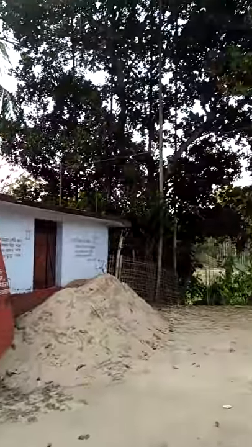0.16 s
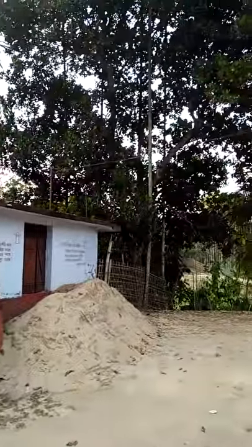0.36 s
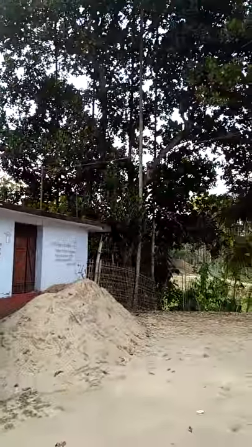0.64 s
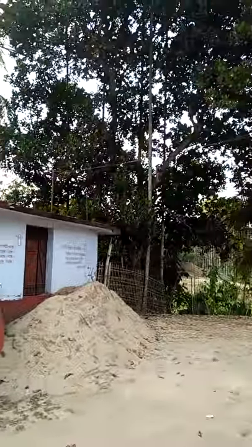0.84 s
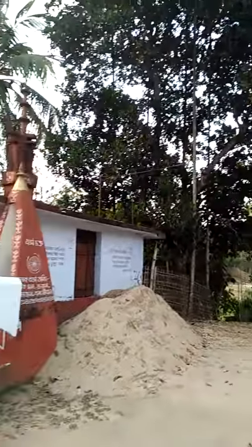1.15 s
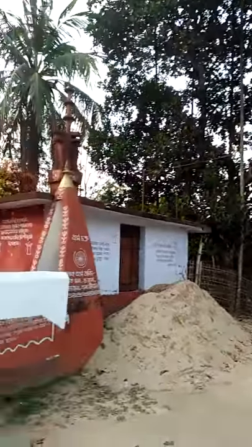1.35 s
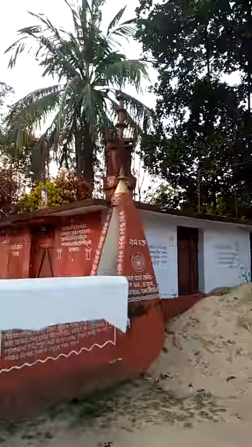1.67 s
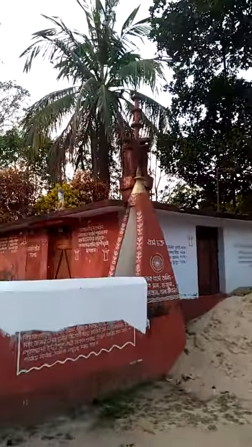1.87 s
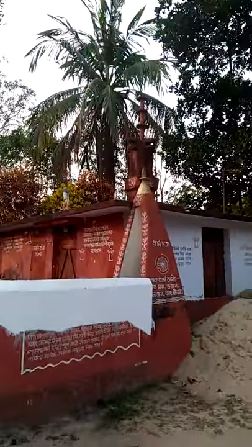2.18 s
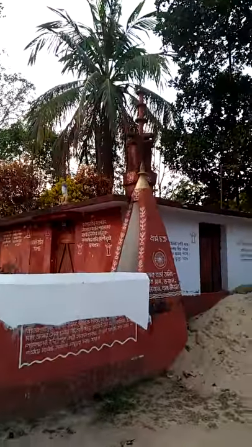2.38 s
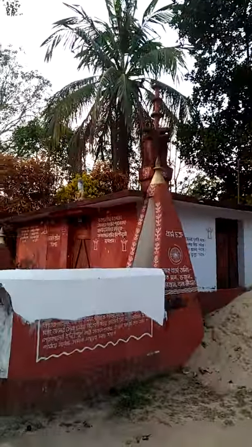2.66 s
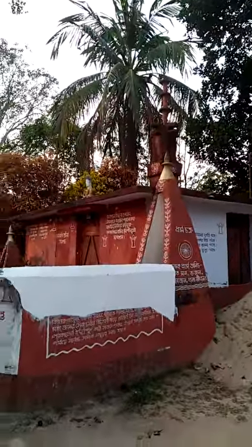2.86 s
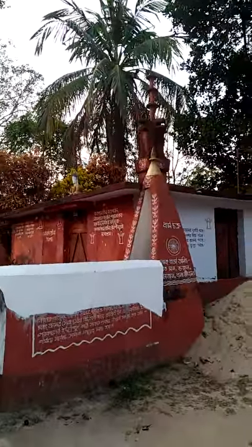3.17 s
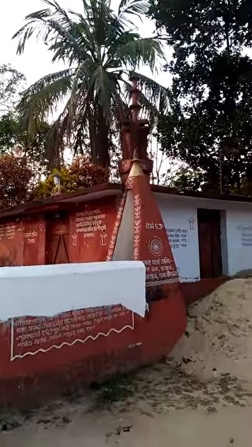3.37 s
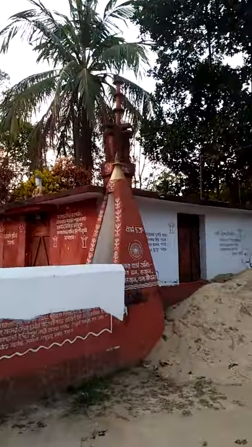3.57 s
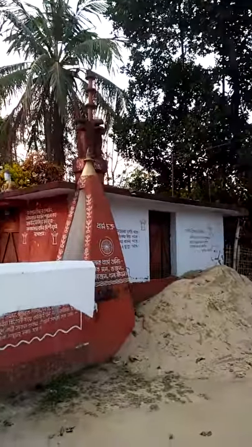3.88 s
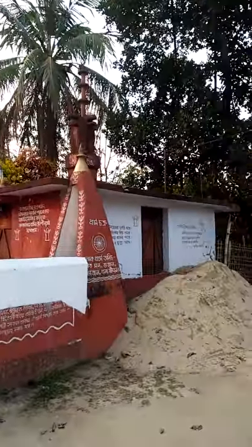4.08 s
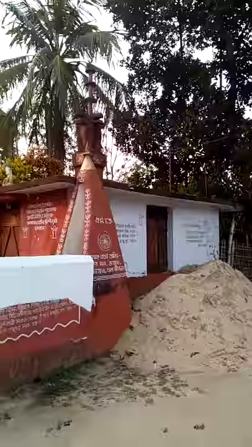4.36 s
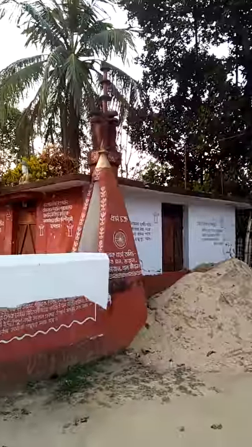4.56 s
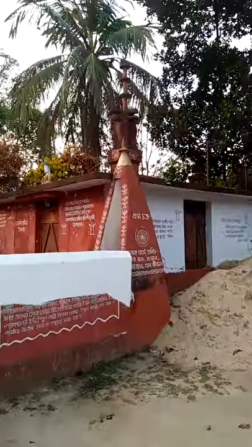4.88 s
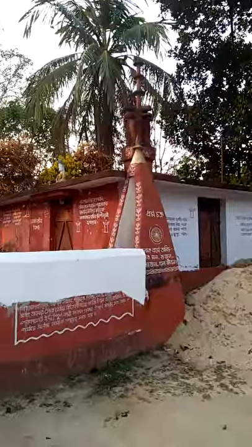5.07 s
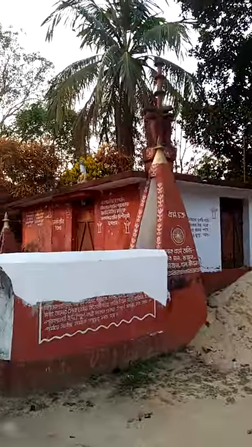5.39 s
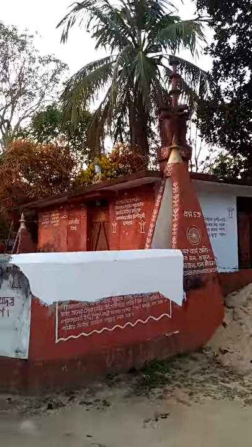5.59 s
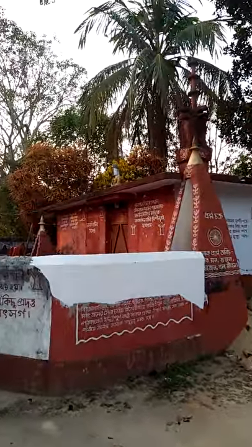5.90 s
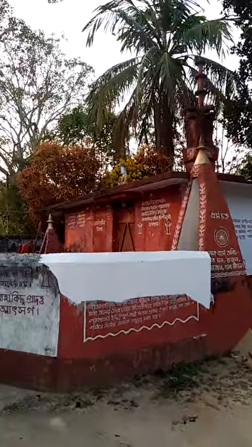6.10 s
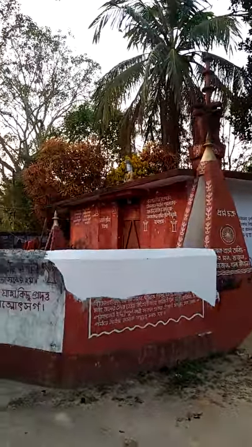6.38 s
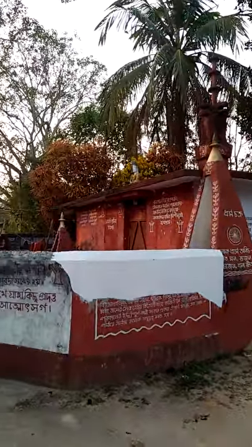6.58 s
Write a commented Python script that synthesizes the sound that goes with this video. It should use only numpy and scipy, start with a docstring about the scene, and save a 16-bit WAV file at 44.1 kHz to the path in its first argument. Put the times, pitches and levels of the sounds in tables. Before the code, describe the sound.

An open yard beside buildings and trees, quiet and airy. From 0 to 1.2 s there is faint hiss, a low distant murmur and thin, soft bird chips and trills. Tiny dry ticks click close by at about 1.3 and 1.6 s. From about 1.6 s a single cow moo rises from a low, rough start, holds full and nasal around 2.0 to 2.5 s, then sags and roughens, gone by about 3.1 s, with short scattered echoes from walls and trunks. Birds whistle over it. Around 3.5 s a very faint dove-like coo lies beneath sparser calls. From about 4.4 s birds sound nearer: sharp bending whistles, buzzy fast trills and a swelling treble hiss, with a bright chirp near 6.2 s. Light wind rumbles in uneven lumps at the microphone, and a faint low hum swells late, until the end at 6.7 s.

```python
"""First the listener hears air hiss, a low murmur and thin bird trills; then a cow moos once across an open yard.
Small birds whistle and buzz in the trees, as bending near-sines that foliage smears, nearer later on.
Light wind rumbles on the microphone as lumpy low noise, over faint hums and a few small dry ticks close by.
The moo is a sum of voice partials shaped by throat and mouth; walls and trunks throw it back.
A treble hiss swells with the bird calls."""
import sys
import numpy as np
from scipy import signal
from scipy.io import wavfile
from scipy.ndimage import uniform_filter1d, map_coordinates

SR = 44100
rng = np.random.default_rng(int(sys.argv[2]) if len(sys.argv) > 2 else 0)


def dump_mix(stems):
    """Bounce the given channels to the path in sys.argv[1] as a 16-bit WAV at rate SR."""
    frames = np.atleast_2d(stems).T  # one column per channel
    limited = np.clip(frames, -1, 1)  # hard clip at full scale
    pcm = np.round(limited * 32767).astype(np.int16)
    wavfile.write(sys.argv[1], SR, pcm)


N = 297234  # samples, about 6.74 s

NEAR_FROM_S = 4.45  # from here on the birds sing from nearer perches


def amp(db):
    """Amplitude factor of a level in dB."""
    return 10 ** (np.asarray(db) / 20)


def evened(x):
    """The signal scaled to rms 1."""
    return x / np.sqrt(np.mean(x ** 2) + 1e-20)


def read(points, hz):
    """A (frequency, value) table read on a logarithmic frequency axis."""
    f, value = np.transpose(points)
    return np.interp(np.log(hz + 1), np.log(f + 1), value)


def along(rows):
    """Sample times and interpolated columns of a curve table."""
    s, *columns = np.transpose(rows)
    t = np.arange(s[0], s[-1], 1 / SR)
    return [t] + [np.interp(t, s, c) for c in columns]


def level(rows):
    """Amplitude over the whole scene from a (time, level) table."""
    return amp(np.interp(np.arange(N) / SR, *np.transpose(rows)))


def add(mix, s, sound):
    """Lay a sound into the mix from second s on."""
    part = mix[max(round(s * SR), 0):][:len(sound)]
    part += sound[:len(part)]


def drift(length, hz):
    """Smooth random wander of rms about 1, changing about hz times a second."""
    knots = rng.standard_normal(400)
    at = np.arange(0, length + 8, 8)  # every eighth sample, straight lines between
    curve = map_coordinates(knots, [at * hz / SR % 399], order=3)
    return np.interp(np.arange(length), at, curve)


def sine(hz):
    """A sine along a moving pitch, its phase the running sum of the pitch."""
    return np.sin(2 * np.pi * np.cumsum(hz) / SR)


# How alike left and right are in noise: (frequency [Hz], likeness [0-1])
STEREO_LIKENESS = [(4000, 1), (6000, 0.99), (9000, 0.46), (14000, 0.87)]


def noise(tone, size, patchy_db):
    """Two channels of rms 1 from random short-time spectra with drifting patches."""
    frames, hz = 4 * N // size + 5, np.fft.rfftfreq(size, 1 / SR)
    a, b, c, d, patches = rng.standard_normal((frames, len(hz), 5)).T
    patches = uniform_filter1d(patches, 8, 0)  # smooth across frequency, then time
    patches = evened(uniform_filter1d(patches, 10, 1))
    same = np.clip(read(STEREO_LIKENESS, hz), 0, 1)[:, None]
    left = a + 1j * b
    right = same * left + np.sqrt(1 - same ** 2) * (c + 1j * d)
    z = np.array([left, right]) * amp(read(tone, hz)[:, None] + patchy_db * patches)
    return evened(signal.istft(z, nperseg=size, noverlap=3 * size // 4)[1][:, :N])


# Colour of the air hiss: (frequency [Hz], relative level [dB per Hz])
AIR_TONE = [(100, -31.5), (150, -41.5), (390, 4.5), (730, -5), (1400, 4.5), (3100, 1.5), (4700, -58.5),
            (9000, -10), (10500, -16.5), (14200, -16)]
AIR_DB = -75


def air():
    """Steady two-channel noise with strong patches drifting through its spectrum."""
    return amp(AIR_DB) * noise(AIR_TONE, 512, 7.7)


# Far traffic and leaves swell: (time [s], level [dB])
MURMUR_LEVEL = [(0, -80), (.7, -78.5), (1.5, -69), (3.3, -72.5), (3.6, -71), (5.5, -70), (6.74, -67)]
# Colour of that murmur: (frequency [Hz], relative level [dB per Hz])
MURMUR_TONE = [(200, -36), (450, -20.5), (600, 0), (800, 2), (1200, -6), (2000, -5), (4000, -40.5)]


def murmur():
    """Far traffic and leaves as mid-band noise, alike in both channels."""
    return level(MURMUR_LEVEL) * noise(MURMUR_TONE, 1024, 1.5)[0]


# Gusts at the microphone before the quick lumps: (time [s], level [dB])
GUSTS = [(0, -74), (.1, -84.5), (1.05, -80), (1.19, -70), (1.3, -88), (1.7, -67.5), (2.3, -68), (2.95, -64),
         (3.13, -72), (3.23, -82), (3.5, -84), (3.9, -67), (4.1, -82), (4.75, -69), (5, -79), (5.5, -71),
         (5.72, -72), (5.87, -64), (6.35, -68.5), (6.74, -62)]
# Colour of the wind rumble: (frequency [Hz], relative level [dB per Hz])
WIND_TONE = [(15, -43.5), (35, -31), (50, -10), (63, 4), (85, -9), (120, -6), (200, -12.5), (320, -25),
             (500, -62)]


def wind():
    """Light wind rumbles on the microphone: low noise, lumpy in level, alike in both channels."""
    lumps = amp(4.2 * drift(N, 12))
    return level(GUSTS) * lumps * noise(WIND_TONE, 2048, 0.5)[0]


# Common level of the low hum lines: (time [s], level [dB])
HUM_LEVEL = [(0, -95), (5.2, -87.5), (5.6, -72), (6.3, -72), (6.45, -94), (6.74, -61.5)]
# Hum lines: (frequency [Hz], level against the common one [dB])
HUM_LINES = [(61, 2), (152, 0), (196, -6)]


def hum():
    """Low tones, each wavering slowly in level and pitch."""
    lines = np.zeros(N)
    for hz, db in HUM_LINES:
        waver = amp(db + 2.24 * drift(N, 3.4))
        lines += waver * sine(hz + 1.486 * drift(N, 0.26))
    return level(HUM_LEVEL) * lines


# A thin hum throughout: (frequency [Hz], peak level [dB]), both before their wander
THIN_HUM = (340, -91)


def thin_hum():
    """One faint tone that wanders in level and pitch."""
    hz, db = THIN_HUM
    return amp(db + 3 * drift(N, 4)) * sine(hz + 4 * drift(N, 6))


def leaves(call, smear_db, near_t60=0.045, far_t60=0.5):  # decay times in s
    """Foliage scatters a call into a short dense smear, and trunks farther off add a longer one."""
    t = np.arange(16000) / SR
    decay = amp(-60 * t / near_t60) + amp(-7.5 - 60 * t / far_t60)
    smear = rng.standard_normal(16000) * decay
    smear *= amp(smear_db) / np.linalg.norm(smear)  # level against the direct call
    smear[0] = 1  # the direct call
    return signal.fftconvolve(call, smear)


# Second and third partial of a whistle before the loss with distance: one level each [dB]
OVERTONES_DB = [-21, -35]
FAR_OVERTONES_DB = -10  # distance dulls the overtones of the far birds


def whistle(hz, flutter, jitter, dull_db):
    """A near sine with weak overtones, fluttering in level and trembling in pitch."""
    turns = np.cumsum(hz * (1 + jitter * drift(len(hz), 400.7))) / SR
    tone = np.sin(2 * np.pi * turns)
    for k, db in enumerate(OVERTONES_DB, start=2):
        tone += amp(db + dull_db) * np.sin(2 * np.pi * k * turns)
    return np.sqrt(2) * tone * (1 + flutter * drift(len(hz), 60.9))


SWELL_DB, FADE_DB = 23.5, 16.5  # dB per note length, gained towards the peak and lost after it


def note(length, first_hz, middle_hz, last_hz, db, peak, flutter, jitter, dull_db):
    """The pitch bends through three points while the level swells to one peak and fades."""
    t = np.arange(0, length, 1 / SR)
    u = t / length
    bend_hz = middle_hz - (first_hz + last_hz) / 2
    hz = first_hz + (last_hz - first_hz) * u + bend_hz * np.sin(np.pi * u)
    level_db = db - SWELL_DB * np.maximum(peak - u, 0) - FADE_DB * np.maximum(u - peak, 0)
    edges = np.clip(np.minimum(t / 0.00059, (length - t) / 0.014), 0, 1)  # sharp start, soft end
    return amp(level_db) * whistle(hz, flutter, jitter, dull_db) * edges


# Whistled notes: (start [s], length [s], first pitch [Hz], middle pitch [Hz], last pitch [Hz],
# level at the peak [dB], place of the peak [0-1])
WHISTLED_NOTES = [(0.342, 0.015, 5520, 5760, 5560, -56.5, 0.58),
                  (0.418, 0.013, 1930, 1690, 1550, -56.5, 0.75),
                  (0.448, 0.059, 4420, 5090, 5480, -61.5, 0.96), (0.497, 0.11, 5490, 5385, 5340, -65, 0),
                  (0.476, 0.093, 2234, 2175, 1970, -56, 0.53), (.48, 0.098, 2416, 2540, 2410, -64, 0.3),
                  (0.587, 0.057, 4380, 5150, 6480, -64, 1), (0.618, 0.063, 4410, 3660, 3330, -64, 0.17),
                  (0.636, 0.019, 1930, 1720, 1490, -55, 0.87), (0.759, 0.05, 4550, 3900, 3580, -65.5, 0.24),
                  (0.956, 0.18, 2880, 2987, 2820, -70, 0.1), (1.071, 0.052, 2030, 1770, 1690, -59.5, 0),
                  (1.159, 0.057, 1916, 2250, 2180, -57, 0.52),
                  (1.206, 0.089, 2200, 2293, 2370, -55.5, 0.12),
                  (1.253, 0.12, 3560, 3500, 3525, -53.5, 0.65),
                  (1.352, 0.056, 3430, 3325, 3080, -48.5, 0.55), (1.26, 0.018, 4420, 4050, 3700, -58, 0.4),
                  (1.33, 0.04, 5320, 5820, 5870, -61, 0.4), (1.399, 0.13, 3525, 3400, 3430, -57, 0.25),
                  (1.442, 0.036, 4250, 4600, 4900, -66, 0.76), (1.483, 0.16, 4940, 4920, 4950, -73, 0.12),
                  (1.522, 0.11, 3143, 2966, 2680, -56.5, 0.3), (1.625, 0.036, 3940, 3450, 2880, -68, 0.64),
                  (1.64, 0.034, 4840, 5320, 5600, -64.5, 0.5), (1.655, 0.12, 2784, 2900, 2820, -61.5, 0.28),
                  (1.685, 0.053, 3780, 4320, 4630, -61, 0.6), (1.729, 0.14, 4430, 4580, 4750, -59, 0.2),
                  (1.744, 0.09, 4220, 3980, 4110, -55.5, 0.34), (1.789, 0.12, 4490, 4155, 3820, -58, 0.6),
                  (1.843, 0.16, 4920, 5110, 4870, -60, 0.3), (1.915, 0.06, 2680, 2740, 2600, -54.5, 0.53),
                  (2.03, 0.089, 4400, 3920, 3290, -44.5, 0.99),
                  (2.108, 0.09, 3550, 3280, 2930, -49.5, 0.48), (2.173, 0.15, 4240, 4178, 4240, -55, 0.58),
                  (2.501, 0.086, 2065, 2315, 2469, -54, 0.78), (2.68, 0.18, 2750, 2900, 3110, -60, 0.46),
                  (2.354, 0.022, 4080, 4550, 4250, -53, 0.5), (2.279, 0.14, 3290, 3315, 3346, -55, 0.33),
                  (2.349, 0.066, 3370, 3420, 3380, -52, 0.55),
                  (2.452, 0.061, 3830, 3867, 3470, -52.5, 0.68),
                  (2.524, 0.022, 3560, 3360, 3380, -48.5, 0.16),
                  (2.538, 0.053, 3450, 3710, 3800, -56.5, 0.25),
                  (2.587, 0.067, 4034, 3550, 3530, -54, 0.18),
                  (2.635, 0.095, 3480, 3410, 3340, -55.5, 0.11),
                  (2.673, 0.042, 3580, 3475, 3240, -47, 0.62),
                  (2.716, 0.039, 3460, 3640, 3652, -60.5, 0.57), (2.746, 0.07, 3520, 3430, 3620, -56, 0.53),
                  (2.813, 0.075, 3580, 3394, 3140, -50.5, 0.34), (2.921, 0.1, 4150, 4460, 4040, -53, 0.49),
                  (3.002, 0.13, 4150, 3900, 3810, -54, 0.28), (3.114, 0.081, 3770, 3450, 3060, -56, 0.59),
                  (2.954, 0.16, 5340, 5460, 5680, -61.5, 0.03), (2.96, 0.082, 2607, 2450, 2499, -61, 0.25),
                  (3.025, 0.025, 2610, 2354, 2647, -57, 0.16), (3.388, 0.023, 3860, 3990, 3990, -78, 0.3),
                  (3.443, 0.064, 4130, 4190, 4800, -59.5, 0.75),
                  (3.458, 0.26, 3300, 3423, 3157, -62.5, 0.42), (3.8, 0.12, 2350, 2535, 2492, -49.5, 0.59),
                  (4.046, 0.13, 2550, 2580, 2450, -64, 0.5), (3.865, 0.18, 3430, 3464, 3240, -53, 0.9),
                  (4.028, 0.087, 3310, 3424, 3360, -59, 0.3), (3.916, 0.17, 3120, 3130, 2900, -68, 0.36),
                  (3.986, 0.28, 1194, 1281, 1282, -67.5, 0.07), (4.15, 0.086, 3000, 2988, 2720, -53, 0.46),
                  (4.24, 0.15, 2920, 2900, 2740, -62, 0.26), (4.161, 0.31, 1365, 1478, 1546, -69.5, 0.23),
                  (4.179, 0.026, 5350, 5460, 6430, -52, 0.9), (4.249, 0.021, 3660, 3360, 2950, -43.5, 0.95),
                  (4.278, 0.18, 2220, 1980, 1950, -63.5, 0.26), (4.305, 0.063, 3770, 4035, 4630, -55, 0.59),
                  (4.354, 0.03, 5060, 5490, 5570, -52, 0.4), (4.363, 0.1, 4190, 4500, 4430, -52, 0),
                  (4.44, 0.093, 4220, 3830, 3580, -53, 0.4), (4.485, 0.096, 1190, 1198, 1143, -53.5, 0.52),
                  (4.459, 0.032, 2465, 2300, 2250, -47, 0.3), (4.484, 0.065, 2510, 2680, 2790, -47.5, 0.14),
                  (4.546, 0.054, 2630, 2520, 2590, -52.5, 0.7),
                  (4.534, 0.09, 4490, 4713, 4830, -45.5, 0.34),
                  (4.565, 0.088, 3894, 3820, 3700, -57.5, 0.2),
                  (4.637, 0.036, 3600, 3800, 3320, -42.5, 0.48), (4.67, 0.046, 4240, 4240, 4030, -52, 0.35),
                  (4.71, 0.037, 4020, 3910, 3600, -54, 0.3), (4.785, 0.044, 3270, 3050, 2950, -65, 0.3),
                  (5, 0.12, 3180, 3208, 3370, -52.5, 0.4), (5.008, 0.17, 6730, 6220, 6240, -68.5, 0.5),
                  (5.049, 0.14, 4940, 4660, 4780, -62.5, 0.5), (4.728, 0.032, 7640, 7660, 7650, -60, 0.8),
                  (4.856, 0.12, 2550, 2416, 2380, -66, 0.05), (5.012, 0.12, 3860, 3660, 3600, -72, 0.2),
                  (5.508, 0.063, 5320, 5900, 5600, -69, 0.5), (5.489, 0.11, 2780, 2840, 2860, -45, 0.53),
                  (5.585, 0.117, 2900, 2902, 2890, -45.5, 0.34), (5.718, 0.066, 2874, 2880, 3050, -62, 0.9),
                  (5.526, 0.11, 4400, 4610, 4800, -56, 0.27), (5.622, 0.12, 4700, 5560, 5870, -63, 0.2),
                  (5.736, 0.076, 1935, 2130, 2080, -58, 0.63), (5.84, 0.1, 3453, 3480, 3660, -54, 0.63),
                  (5.844, 0.084, 5050, 5220, 5430, -66.5, 0.66),
                  (5.955, 0.098, 1860, 2060, 1975, -62.5, 0.45), (5.988, 0.039, 720, 698, 625, -63.5, 0.55),
                  (6.179, 0.047, 4650, 4652, 4880, -39, 0.45), (6.207, 0.12, 4260, 4250, 4020, -55, 0.65),
                  (6.349, 0.069, 2154, 2091, 1960, -53, 0.35), (6.396, 0.07, 6670, 7440, 7150, -60.5, 0.17),
                  (6.437, 0.075, 3450, 3273, 3050, -45, 0.97),
                  (6.494, 0.099, 3040, 3092, 2866, -46.5, 0.41),
                  (6.498, 0.1, 4700, 4520, 4450, -54.5, 0.14), (6.56, 0.13, 3620, 3640, 3810, -53, 0.22),
                  (6.653, 0.14, 3700, 3700, 3700, -54.5, 0.71), (6.578, 0.094, 940, 871, 900, -63, 0.4)]
TREMBLE_FAR, TREMBLE_NEAR = 0.012, 0.017  # share of the pitch by which a note trembles


def whistled_notes():
    """Single bird notes, duller from afar, each smeared by foliage."""
    out = np.zeros(N)
    for s, *shape in WHISTLED_NOTES:
        near = s > NEAR_FROM_S
        jitter, dull_db = (TREMBLE_NEAR, 0) if near else (TREMBLE_FAR, FAR_OVERTONES_DB)
        call = note(*shape, flutter=0.5, jitter=jitter, dull_db=dull_db)
        add(out, s, leaves(call, -2.0))
    return out


# A far dove, before its level wander: (start [s], length [s], first pitch [Hz], middle pitch [Hz],
# last pitch [Hz], level at the peak [dB], place of the peak [0-1])
DOVE_COO = (3.47, .8, 745, 735, 722, -76, .4)


def dove():
    """One low bending note, uneven in level and heavily smeared."""
    s, *shape = DOVE_COO
    coo = note(*shape, flutter=1.0, jitter=0.025, dull_db=FAR_OVERTONES_DB)
    uneven = amp(3.0 * drift(len(coo), 12))
    out = np.zeros(N)
    add(out, s, leaves(coo * uneven, 0.5))
    return out


# Trills of quick falling chips: (start [s], end [s], top pitch at the start [Hz],
# bottom pitch at the start [Hz], bottom pitch at the end [Hz], mean chip rate [1/s], level [dB])
CHIP_TRILLS = [(0, 0.104, 5200, 3290, 3360, 74, -68.5), (.0, 0.35, 2800, 2300, 1796, 40, -68.5),
               (0.482, 0.637, 2700, 2060, 1830, 47, -65.5), (0.739, 0.898, 2400, 1954, 1604, 44, -65),
               (0.634, 0.867, 4450, 3740, 3560, 63, -78), (0.533, 0.568, 6800, 3670, 3450, 56, -69.5),
               (1.605, 1.686, 3900, 2730, 2940, 54, -60.5), (2.254, 2.448, 4700, 3540, 3870, 66, -57),
               (1.19, 1.567, 2600, 2033, 1750, 84, -62.5), (1.882, 1.987, 4670, 3450, 3424, 69, -56),
               (2.256, 2.296, 7150, 4500, 4445, 49, -58), (3.404, 3.517, 4520, 3400, 4080, 77, -67.5),
               (3.509, 3.613, 2550, 2000, 2710, 73, -66), (3.573, 3.718, 2950, 2556, 1887, 63, -60.5),
               (4.186, 4.235, 5970, 5210, 5530, 59, -70), (4.411, 4.496, 2280, 1685, 2210, 51.5, -57),
               (4.525, 4.564, 7200, 4780, 4370, 170, -56.5), (4.579, 4.861, 4700, 3310, 3510, 90, -60),
               (5.139, 5.25, 6300, 4090, 3710, 110, -50.5), (5.174, 5.317, 5000, 3680, 3760, 87, -55.5),
               (5.466, 5.697, 3000, 2267, 2710, 120, -53.5), (6.06, 6.196, 3800, 3210, 2650, 113, -54),
               (6.112, 6.393, 4807, 2937, 3580, 126, -53), (6.155, 6.193, 7300, 4400, 4450, 76, -48.5),
               (6.367, 6.456, 4900, 3780, 3576, 92, -54), (6.497, 6.53, 6500, 4480, 4500, 93, -56.5),
               (6.622, 6.753, 4870, 3720, 3290, 76, -57), (6.251, 6.314, 8600, 7100, 7300, 62, -62.5)]
RASP = .03  # pitch tremble of a far trill as a share; near trills rasp twice as much


def trills():
    """The pitch drops over and over in quick chips, with a dip in level between them."""
    out = np.zeros(N)
    for s, end, top_hz, low_hz, last_hz, rate, db in CHIP_TRILLS:
        near = s > NEAR_FROM_S
        t = np.arange(0, end - s, 1 / SR)
        chip = np.cumsum(rate * (1 + .35 * drift(len(t), 40))) / SR % 1  # place within a chip
        bottom = np.linspace(low_hz, last_hz, len(t))
        reach = (top_hz - bottom) * np.linspace(1, .5, len(t))  # later chips reach less high
        hz = bottom * (1 + 0.0295 * drift(len(t), 49.87))
        hz += reach * (1 - chip) ** 1.5  # each chip drops fast, then levels off
        beat = np.sin(np.pi * chip) ** (.15 if near else .5)
        beat *= signal.windows.tukey(len(t), .45)
        dull_db = 0 if near else FAR_OVERTONES_DB
        call = whistle(hz, flutter=0.18, jitter=RASP * (1 + near), dull_db=dull_db)
        add(out, s, leaves(amp(db) * call * beat, -1.6))
    return out


# Colour of the hiss with the birds: (frequency [Hz], relative level [dB per Hz])
FIZZ_TONE = [(1500, -24), (2500, 1.5), (5000, -2.5), (7000, -4), (9200, -3.5), (10200, -13.5),
             (14200, -17.5)]
FIZZ_DB, NEAR_FIZZ_DB = -13, 5.5  # dB against song whose shrillness is at the pivot; dB more when near
FIZZ_PIVOT_DB, FIZZ_FOLLOW = -50, .6  # the hiss follows this share of the birds' swings in dB


def fizz(song):
    """A wide treble hiss rises and falls with the birds, most with the shrill ones."""
    shrill = signal.lfilter([1, -.8], [1], song)
    shrill = signal.lfilter([1, -.9], [1], shrill)
    loudness = np.sqrt(abs(uniform_filter1d(shrill ** 2, size=1800)))  # over about 41 ms
    near = np.arange(N) / SR > NEAR_FROM_S
    pivot = amp(FIZZ_PIVOT_DB)
    swell = pivot * (loudness / pivot) ** FIZZ_FOLLOW
    return amp(FIZZ_DB + NEAR_FIZZ_DB * near) * swell * noise(FIZZ_TONE, 512, 3.2)


# Small dry ticks close by: (time [s], starting level of the decay [dB], ring pitch [Hz], ring t60 [s])
DRY_TICKS = [(1.281, -30.5, 3570, 0.0014), (1.2855, -23, 6700, 0.00089), (1.597, -40.5, 1190, 0.0064),
             (1.6, -45, 1380, 0.0061)]


def ticks():
    """Each tick is a heavily damped ring with a burst of crackle."""
    out, t = np.zeros(N), np.arange(900) / SR
    for s, db, hz, t60 in DRY_TICKS:
        crackle = 0.11 * np.diff(rng.standard_normal(901)) * (hz / 5000)
        ring = np.sin(2 * np.pi * hz * t) + crackle
        onset = np.minimum(t / 0.00011, 1)
        add(out, s, leaves(amp(db - 60 * t / t60) * ring * onset, -0.45))
    return out


# Dying away of the yard's echoes: (frequency [Hz], t60 [s])
YARD_DECAY = [(200, 0.75), (1000, 0.4), (3000, 1), (8000, 0.14)]
BASS_ECHO = .15  # share of the whole voice, bass included, that the yard throws back


def yard(voice):
    """Sparse echoes of random sign off walls and trunks, each band dying at its own speed."""
    thin = signal.lfilter(*signal.butter(2, 500, "high", fs=SR), voice)  # little bass is scattered
    taps = np.zeros(SR)
    at = np.arange(400, SR - 20, 20)  # one echo in every 20 samples
    taps[at + rng.integers(0, 20, len(at))] = rng.choice([-1., 1.], len(at))
    hz, t, z = signal.stft(taps, SR, nperseg=256)
    decay = amp(-60 * t / read(YARD_DECAY, hz)[:, None])
    tail = signal.istft(z * decay, SR, nperseg=256)[1]
    thrown = amp(-2.0) * thin + BASS_ECHO * voice
    return signal.fftconvolve(thrown, tail / np.linalg.norm(tail))[:N]


def modes(table, hz):
    """Gain and phase of a set of resonances with steep skirts, along a slowly moving pitch."""
    slow_hz = hz[::16]
    gain = sum(amp(db) / np.square(1 + 2j * (slow_hz - f) / w) for f, w, db in table)
    return np.repeat(gain, 16)[:len(hz)]


# The moo across the yard: (time [s], pitch [Hz], effort [dB], mouth ring [dB], chest [dB]);
# mouth ring and chest (the lowest partial) are relative to the effort
MOO_COURSE = [(1.58, 70.2, -68, -13, -37), (1.68, 89.8, -66.5, -45, 0), (1.76, 118.4, -52.5, -3, -9.5),
              (1.866, 139.2, -44.5, 6.5, -11.5), (1.93, 143, -41, 3, -40), (1.975, 145.4, -55, 15, -16),
              (2.045, 148.2, -38.5, -2, -25.5), (2.11, 149.8, -38, 8, -18.5), (2.2, 151.4, -40.5, -3, -12),
              (2.27, 152.8, -35.5, -14, -18.5), (2.34, 152.8, -34, -5.5, -20),
              (2.45, 151.4, -37, -8, -15.5), (2.49, 150.7, -45, 7, -13), (2.58, 147, -48.5, 5, -19),
              (2.655, 141.5, -33.5, -7.5, -33), (2.7, 130.3, -55.5, 13.5, 3), (2.77, 108.6, -38, -2.5, -26),
              (2.84, 88.8, -52.5, 0.5, -1), (2.91, 71.75, -55.5, -15.5, -38), (2.99, 63.5, -80, 3, 10),
              (3.14, 60.6, -84.5, -13, 24.5), (3.2, 59.7, -100, 7, 26)]
# Resonances of throat and mouth: (frequency [Hz], width [Hz], gain [dB])
THROAT = [(282, 75, -1), (455, 80, -16), (620, 130, -13.5), (790, 200, -14)]
MOUTH = [(1060, 100, -3), (910, 120, -13), (1500, 300, -32), (1850, 200, -25), (2090, 150, -23)]
# Rings more as the voice slackens: (frequency [Hz], width [Hz], gain [dB])
SLACK_RING = [(1253, 52, -1)]
FIRM_HZ, ROUGH_FIRM = 158.9, 0.054  # Hz and roughness (0-1) of a firm, steady voice
ROUGH_RISING, ROUGH_FALLING = 0.9, 1.697  # roughness gained per share of pitch below FIRM_HZ
SHIMMER_DB = 3.5  # rms wander of the mouth ring at full roughness


def cow():
    """Pulses of the vocal folds as partials weighted by throat and mouth; slack pulses come unevenly."""
    t, hz, effort_db, mouth_db, chest_db = along(MOO_COURSE)
    rising = t < t[np.argmax(hz)]
    slack = np.where(rising, ROUGH_RISING, ROUGH_FALLING) * (1 - hz / FIRM_HZ)
    rough = np.clip(ROUGH_FIRM + slack, 0, 1)
    turns = np.cumsum(hz * (1 + 0.045 * rough * drift(len(t), 59.9))) / SR
    voice = amp(chest_db) * np.cos(2 * np.pi * turns)
    opening = amp(mouth_db + SHIMMER_DB * rough * drift(len(t), 69.87))
    for k in range(2, 32):
        mouth = modes(MOUTH, k * hz) + rough * modes(SLACK_RING, k * hz)
        gain = modes(THROAT, k * hz) + opening * mouth
        blur = 0.06 * rough ** 1.5 * k  # slack folds unsettle the higher partials most
        phase = 2 * np.pi * k * turns + blur * drift(len(t), 120)
        waver = amp(min(.25 * (k - 2), 1.5) * drift(len(t), 8))
        voice += waver * (gain * np.exp(1j * phase)).real
    out = np.zeros(N)
    add(out, t[0], np.sqrt(2) * amp(effort_db) * voice * signal.windows.tukey(len(t), .05))
    return out


def scene():
    """Background, birds with their hiss, ticks, and the cow with the yard's echoes."""
    background = air() + murmur() + wind() + hum() + thin_hum()
    song = whistled_notes() + dove() + trills()
    moo = cow()
    return background + song + fizz(song) + ticks() + moo + yard(moo)


EDGE_HZ = 14300  # upper band edge of the recorder


def record(dry):
    """The band limit of the recorder: a steep low-pass on both channels."""
    low_pass = signal.firwin(511, EDGE_HZ, window=("kaiser", 9), fs=SR)
    return signal.oaconvolve(dry, low_pass[None], "same")


dry = scene()
out = record(dry)
dump_mix(out)
```